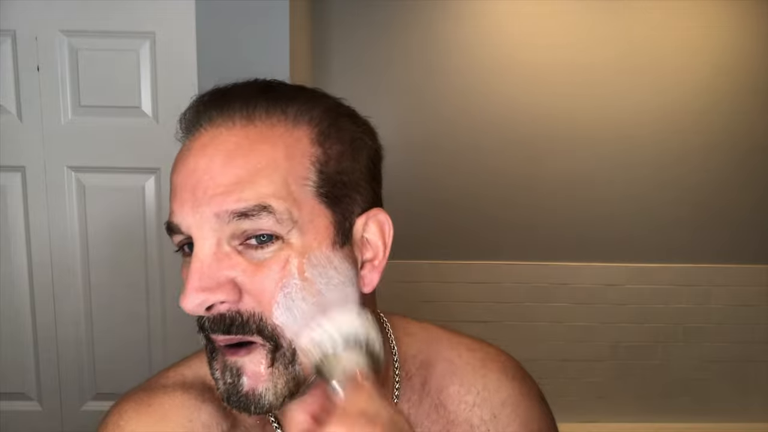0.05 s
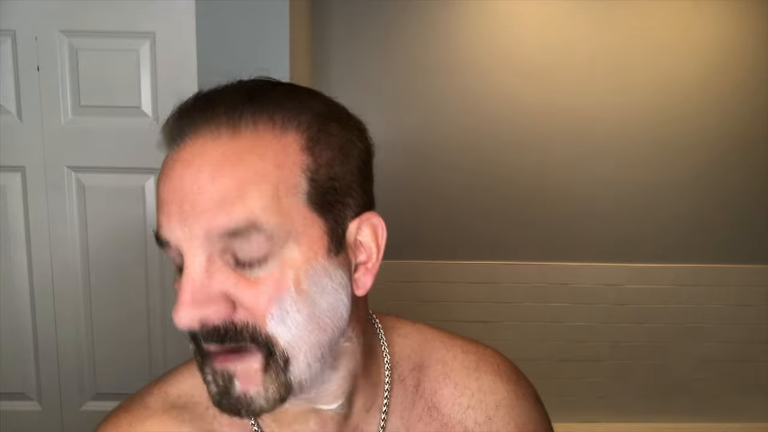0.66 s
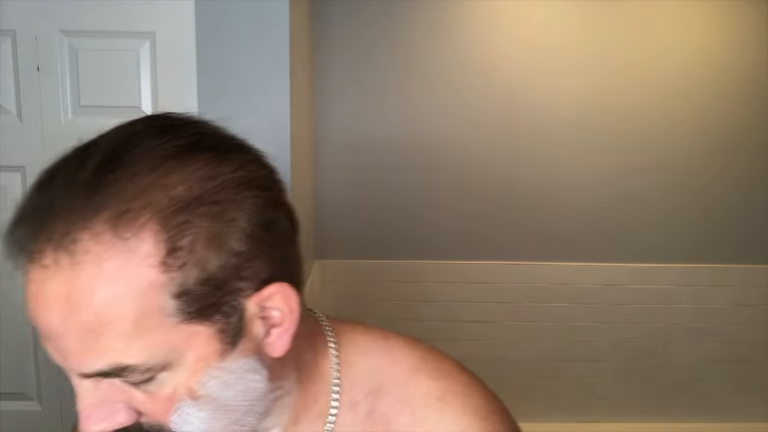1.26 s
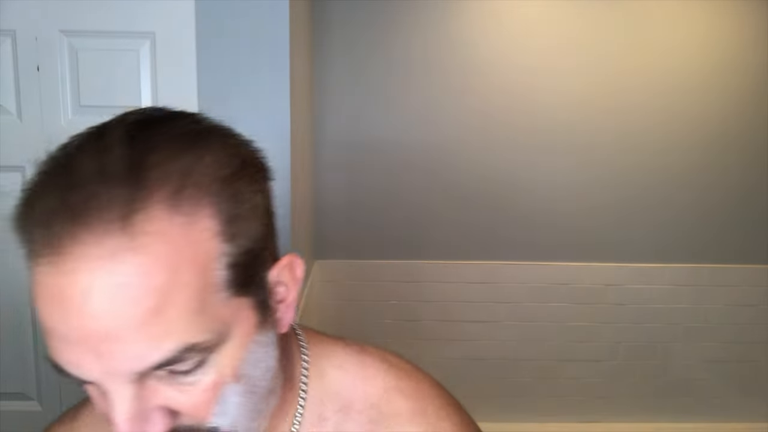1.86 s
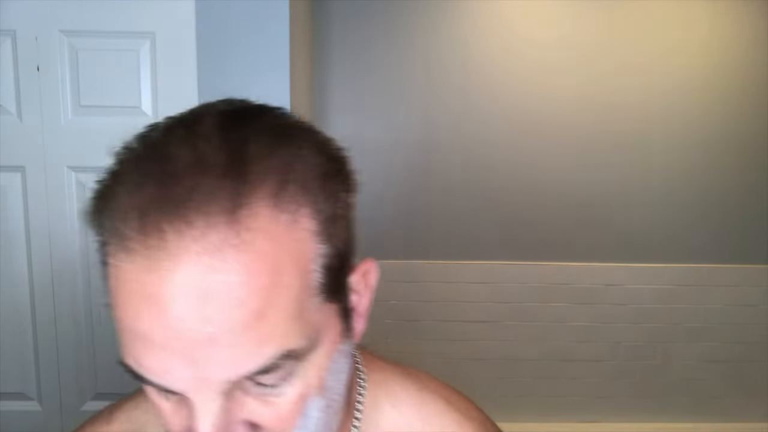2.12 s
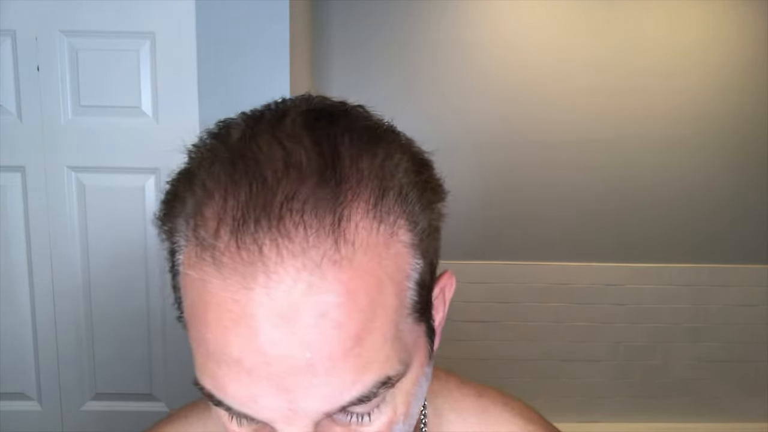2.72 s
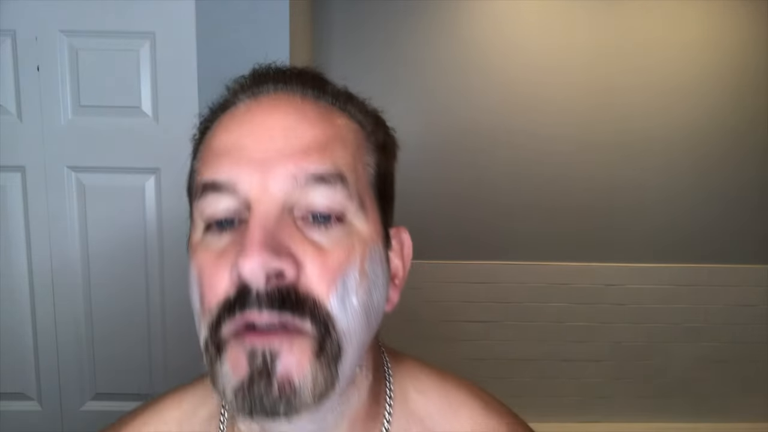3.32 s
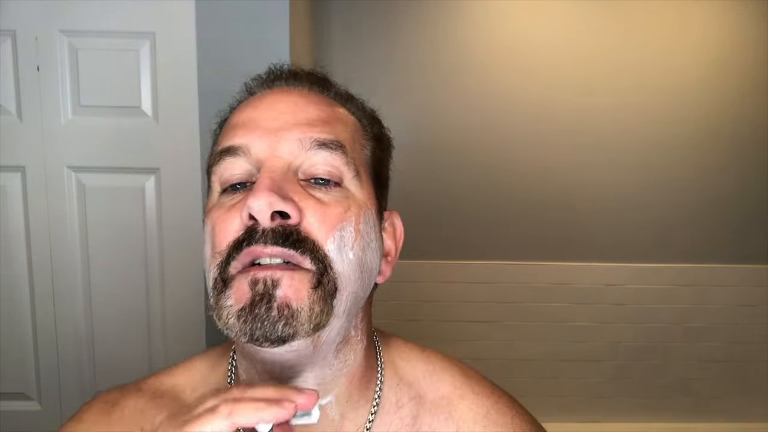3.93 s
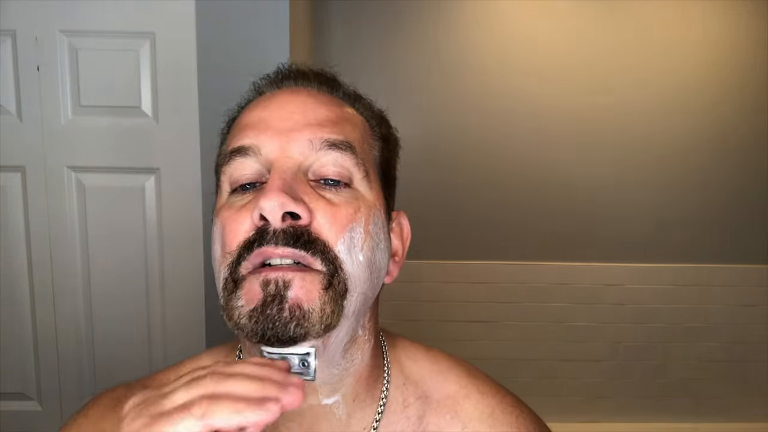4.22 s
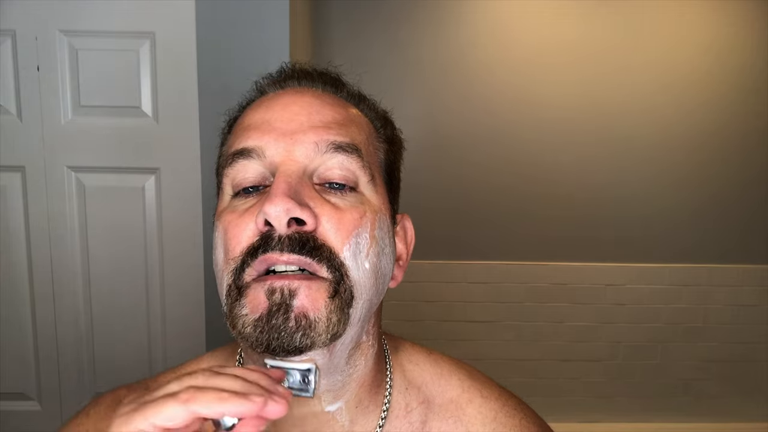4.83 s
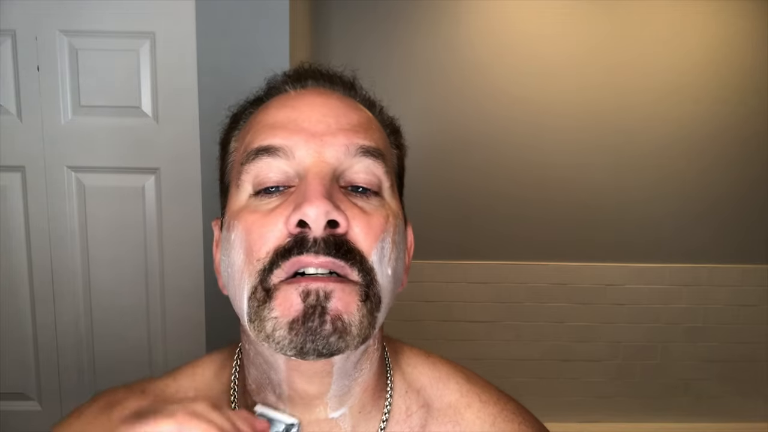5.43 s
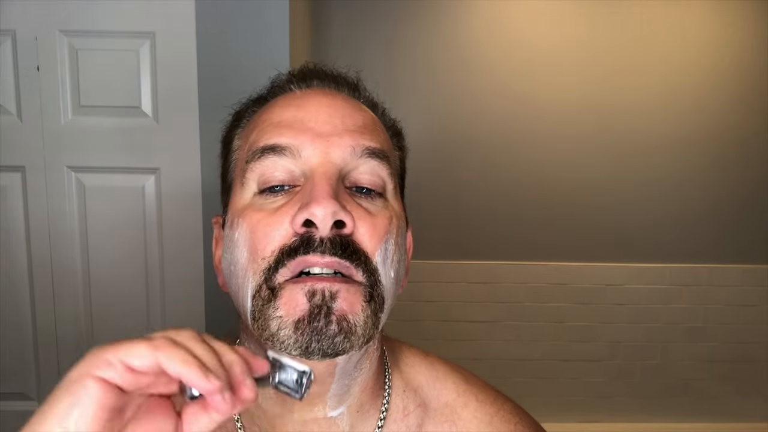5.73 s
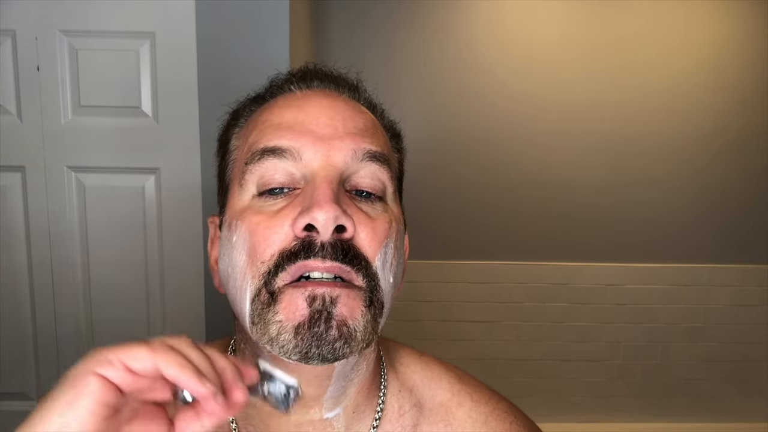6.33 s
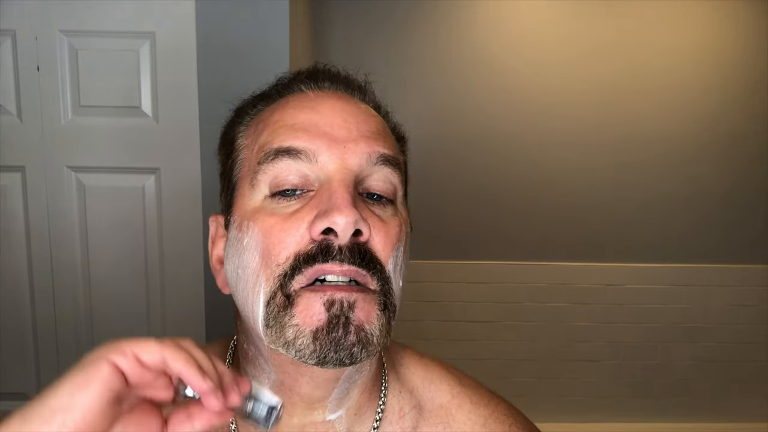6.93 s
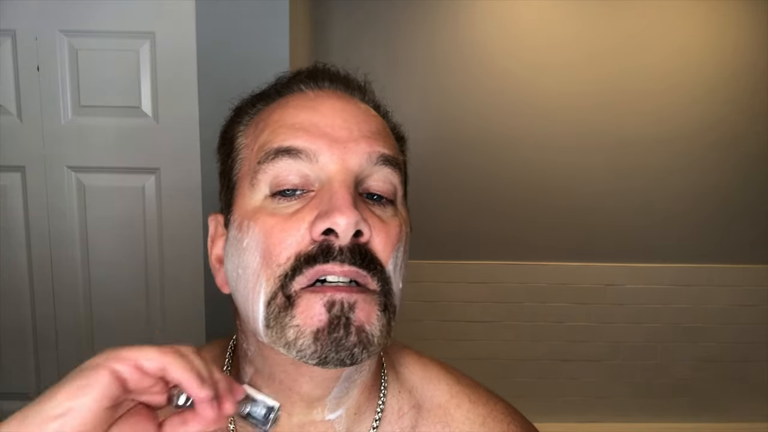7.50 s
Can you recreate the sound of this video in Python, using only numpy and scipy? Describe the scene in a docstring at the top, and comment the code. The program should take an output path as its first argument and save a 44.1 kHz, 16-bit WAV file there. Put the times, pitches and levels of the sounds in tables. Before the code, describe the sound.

A shaving brush swishes softly through lather, then is set down on the counter with a loud, ringing knock. A tap handle clicks, and water briefly hisses and splashes over a razor while the drain glugs. After a last gurgle, the razor scrapes through stubble in five slow, quiet strokes. The microphone is close, in an echoing tiled bathroom with faint ventilation.

```python
"""A tiled bathroom, heard through one close microphone. A shaving brush swishes through lather and is
set down hard on the counter, which rings. The tap handle clicks, water hisses and splashes over a razor,
and pockets of air glug in the drain. Then the razor scrapes through stubble in slow strokes.
The tiles echo these sounds, and the ventilation rushes faintly behind them."""
import sys
import numpy as np
from scipy import signal
from scipy.fft import rfft, irfft, next_fast_len
from scipy.io import wavfile
from scipy.ndimage import map_coordinates

SR = 44100
rng = np.random.default_rng(int(sys.argv[2]) if len(sys.argv) > 2 else 0)


def transcribe(signal):
    """Save signal, clipped to [-1, 1], as a 16-bit WAV file at the path in sys.argv[1]."""
    frames = np.atleast_2d(signal).T
    limited = np.clip(frames, -1, 1)
    pcm = np.round(limited * 32767).astype(np.int16)
    wavfile.write(sys.argv[1], SR, pcm)


N = 333396


# tone of the jet, from low to high: f/Hz, level/dB
JET_TONE = [(150, -24), (400, -19), (900, -16.5), (1150, -11), (1600, -8.5), (3700, -11.5), (5000, -4),
            (6400, -9), (8700, -14), (11000, -7.5), (15500, -6)]
# notes the spout sings: f/Hz, width/Hz, level/dB
SPOUT_NOTES = [(1536, 92, -11.5), (2360, 55, -11.5), (3000, 60, -15), (4950, 130, -9.5), (6330, 68, 0),
               (7330, 50, -5.5), (7880, 210, -10)]
# bursts of spray as the razor enters the jet and is turned over: t/s, level/dB
SPRAY_BURSTS = [(2.331, -38.5), (2.909, -43.5)]
# tone of the spray: f/Hz, level/dB
SPRAY_TONE = [(530, -45), (900, -19), (1750, -26), (1980, -16.5), (2860, -4.5), (3500, -4.5), (4600, -1),
              (5840, -2), (7410, 0), (9510, -2), (15500, -8.5)]
# big drops thrown off the razor: t/s, level/dB, f/Hz
BIG_DROPS = [(2.331, -19, 7100), (2.3624, -26, 6540), (2.5548, -25, 7250), (2.5634, -18, 6350),
             (2.6227, -23.5, 6560), (2.647, -25, 12000), (2.754, -30, 13100), (2.8428, -24, 6000),
             (2.8746, -24, 6800), (3.1029, -24.5, 7100)]
def tap():
    """Water hisses through the tap's mesh, sings in the spout and breaks into drops on razor and basin."""
    hiss = coloured(grains(rate=9000, spread_db=5), JET_TONE)
    song = resonate(rng.standard_normal(N), SPOUT_NOTES)
    jet = flow() * amp(1.36 * wobble(25)) * (amp(-42) * hiss + amp(-47) * song)
    razor_in_jet = envelope(start=2.331, end=3.1, rise_s=0.003, fade_s=0.06)
    impact = amp(-43.5) * flow() ** 0.216 * razor_in_jet  # the spray weakens more slowly than the flow
    impact += swells(SPRAY_BURSTS, rise_s=0.003, fade_s=0.368)
    flicker = amp(0.64 * wobble(45))
    spray = coloured(droplets(rate=2000, spread_db=5, cycles=15.6), SPRAY_TONE)
    drops = pings([(s, db, hz, 12 / hz, 0.2) for s, db, hz in BIG_DROPS], rise=0.094)
    return room(jet, wet_db=-4.5) + room(impact * flicker * spray + drops, wet_db=-5.5)


def flow():
    """How much water runs, from 0 to 1: the tap opens at once, runs and is eased shut."""
    return envelope(start=2.174, end=2.835, rise_s=0.013, fade_s=0.9)


# water sloshes in the trap, the bend under the basin: t/s, level/dB
TRAP_SLOSHES = [(2.07, -59), (2.26, -81), (3.0, -54.5), (3.42, -60.5), (3.6, -70.5), (3.82, -64)]
# low notes of the trap: f/Hz, width/Hz, level/dB
TRAP_NOTES = [(76, 19, -3.5), (136, 63, -3), (252, 54, 3.5), (454, 560, -9.5)]
# big air pockets glug, small ones chirp, and one high drip falls at 3.453 s: t/s, level/dB, f/Hz, life/s,
# glide/octaves per life
AIR_POCKETS = [(2.038, -49.5, 196, 0.092, -0.84), (2.108, -46.5, 126, 0.064, 0),
               (2.155, -46.5, 117, 0.059, 0.14), (2.361, -43.5, 265.5, 0.059, .1),
               (2.958, -51, 243.6, 0.099, 0.083), (2.982, -43.5, 114, 0.06, 0.24),
               (3.035, -50, 117, 0.038, 0.32), (3.1, -57.5, 259.4, .17, -0.13),
               (3.24, -61, 256, 0.18, -0.014), (3.453, -59, 4000, 0.0075, 0), (3.495, -61, 650, .068, 0.62),
               (3.515, -48.5, 139, 0.055, .1), (3.744, -57.5, 2300, 0.096, -0.053),
               (3.749, -59, 1815, 0.041, 0.039)]
# the emptying drain sucks air: t/s, level/dB
AIR_GULPS = [(3.598, -62), (3.788, -56.5), (3.816, -54.5), (3.935, -67), (3.963, -65.5)]
# notes of the waste pipe: f/Hz, width/Hz, level/dB
PIPE_NOTES = [(280.6, 120, -11), (975.6, 83, 4.5), (1545, 99, 2.5), (2160, 150, 3), (2900, 430, -4.5),
              (3740, 120, -2.5), (4670, 180, -7), (5600, 310, -7), (7730, 3000, -18)]
def drain():
    """Water churns and air pockets glug in the trap; the last water leaves with a squeak and a gurgle."""
    stir = amp(-63.5) * flow() + swells(TRAP_SLOSHES, rise_s=0.11, fade_s=0.82)
    churn = stir * resonate(grains(rate=400, spread_db=0), TRAP_NOTES)
    glugs = pings(AIR_POCKETS, rise=0.05) * amp(2.3 * wobble(70))
    suction = swells(AIR_GULPS, rise_s=0.018, fade_s=0.12)
    gurgle = suction * resonate(grains(rate=650, spread_db=3), PIPE_NOTES)
    return churn + room(glugs, wet_db=-3.5) + room(gurgle, wet_db=-3.5)


# the hit that sets off crack, thud and ring: t/s, level/dB
BRUSH_HIT = [(1.339, 8)]
# tone of the thud: f/Hz, level/dB
THUD_TONE = [(30, -54), (45, -28.5), (68, -3.5), (110, -15.5), (200, -5), (400, -8), (520, -0.5), (800, -7),
             (1100, -3), (2300, -3), (3800, -4.5), (5500, -10.5), (8000, -16), (9500, -28), (15500, -30.5)]
# notes of counter and basin: f/Hz, relative level/dB, time to fade by 60 dB/s
COUNTER_NOTES = [(343, -10.5, .6), (542, -7.5, 0.6), (677, -7.5, .85), (823, -13.5, 0.99),
                 (993, -6.5, 0.79), (1152, -11, 0.86), (1364, -6.5, 0.49), (1794, -8, .35),
                 (1997, -10, 0.49), (2287, -1.5, 0.552), (2455, -7.5, 0.82), (2859, -6, 0.71),
                 (3060, -10, 0.62), (3163, -15, .7), (3430, -5, 0.83), (3550, -7.5, .6), (3845, -7, 0.5505),
                 (3891, -12, .6), (4520, -13.5, .6), (5684, -15.5, 0.78)]
def brush_knock():
    """The hard brush handle hits the counter with a sharp crack and a thud; counter and basin ring on."""
    t = np.arange(SR) / SR
    notes = sum(amp(db) * np.exp(-np.log(1000) * t / fade_s) * np.sin(2 * np.pi * (hz * t + rng.random()))
                for hz, db, fade_s in COUNTER_NOTES)
    ring = amp(-38) * strike(BRUSH_HIT, notes)
    crack = amp(-10.5) * strike(BRUSH_HIT, ping(hz=3265, life=0.0013, glide=0, rise=0.08))
    edge = amp(-36) * strike(BRUSH_HIT, ping(hz=11400, life=0.0025, glide=0, rise=0.087))
    thud = amp(-8) * strike(BRUSH_HIT, blow(THUD_TONE))
    crack = room(crack, wet_db=-8.5, early_db=4, early_s=0.04)
    return edge + crack + room(thud, wet_db=6.5, early_db=-6) + ring


# razor strokes: pressed down t/s, lifted t/s, time to land/s, rasp level/dB, crackle level/dB,
# extra pressure midway/dB, crackle gained from start to end/dB
RAZOR_STROKES = [(3.935, 4.217, .035, -71, -67, -3, 6.5), (4.62, 5.067, .06, -78, -70.5, 3.5, 3.5),
                 (5.578, 5.836, 0.023, -69, -70.5, -2.5, -7), (6.354, 6.55, 0.19, -63.5, -70.5, -3, 1),
                 (7.051, 7.244, 0.17, -60.5, -66.5, -1, 4.5)]
# tone of the blade on skin: f/Hz, level/dB
RASP_TONE = [(700, -9), (1900, -9.5), (2700, -3.5), (4500, -1.5), (6700, -3), (8300, -14.5), (15000, -19.5)]
# tone of the crackling foam: f/Hz, level/dB
CRACKLE_TONE = [(2500, -20), (7000, -2), (9000, -6.5), (13000, -2.5), (15500, 1)]
# single hairs being cut: t/s, level/dB, f/Hz
HAIR_SNAPS = [(4.8623, -50, 6820), (5.6638, -52, 5840), (5.7153, -44.5, 6460), (7.029, -54, 5530),
              (7.079, -51, 6270), (7.2044, -56, 5430)]
def razor():
    """The blade lands, drags and lifts; it rasps over the skin while foam crackles and hairs snap."""
    bite_db = 1.5  # the rasp loses this much over a stroke
    drag, cutting = np.zeros((2, N))
    for start, end, landing, rasp_db, crackle_db, midway_db, gained_db in RAZOR_STROKES:
        travel = np.clip((np.arange(N) / SR - start) / (end - start), 0, 1)
        pressure = envelope(start, end, landing, fade_s=0.28) * amp(midway_db * np.sin(np.pi * travel) ** 2)
        drag += amp(rasp_db + bite_db * (0.5 - travel)) * pressure ** 1.7
        cutting += amp(crackle_db + gained_db * (travel - 0.5)) * pressure
    rasp = drag * amp(0.65 * wobble(32)) * coloured(grains(rate=5000, spread_db=3), RASP_TONE)
    crackle = cutting * amp(1.2 * wobble(40)) * coloured(grains(rate=1400, spread_db=3.5), CRACKLE_TONE)
    snaps = pings([(s, db, hz, 4 / hz, 0) for s, db, hz in HAIR_SNAPS], rise=0.05)
    return room(rasp + crackle + snaps, wet_db=-10)


# fingers rub on the tap handle: t/s, level/dB
FINGER_RUBS = [(1.78, -59), (1.96, -60), (2.14, -63)]
# tone of the rubbing: f/Hz, level/dB
RUB_TONE = [(200, -9), (800, -2.5), (1600, -7.5), (3500, -4), (7000, -14.5), (15500, -29.5)]
# tone of the click: f/Hz, level/dB
CLICK_TONE = [(100, -6), (270, -3), (420, -11), (1100, -4.5), (1480, -1), (2000, -2), (2900, -3), (3600, 1),
              (4300, -15), (4900, -10), (7000, -19), (10000, -40), (15500, -35)]
# notes of the metal handle: f/Hz, level/dB, life/s
METAL_NOTES = [(1403, -53.5, 0.17), (3440, -38.5, 0.02), (3670, -31.5, 0.013), (3880, -46, .01),
               (4240, -42, 0.022)]
def tap_handle():
    """The handle rubs under the fingers, then clicks against its stop with a short metal clink."""
    stop_s, click_db = 1.9195, -26
    fingers = swells(FINGER_RUBS, rise_s=0.09, fade_s=0.64)
    rub = fingers * coloured(grains(rate=3700, spread_db=1), RUB_TONE)
    click = strike([(stop_s, click_db)], blow(CLICK_TONE))
    clink = pings([(stop_s, db, hz, life, 0) for hz, db, life in METAL_NOTES], rise=0.033)
    return rub + room(click, wet_db=9, early_db=-4) + room(clink, wet_db=-6.5)


# swishes of brush and hand: t/s, level/dB, time to swell/s
BRUSH_SWISHES = [(0.021, -58.5, 0.0073), (.06, -64, 0.014), (.28, -65.5, 0.055), (.5, -71, .02),
                 (.68, -76, .1), (.99, -67.5, .06), (1.25, -72, .1)]
# tone of the lather: f/Hz, level/dB
LATHER_TONE = [(120, -45.5), (200, -13), (273, 0), (315, -11), (358, -6.5), (957, -12), (1230, -10),
               (4840, -15.5), (15500, -27.5)]
def brush():
    """Wet bristles swish through the lather."""
    push = sum(amp(db) * envelope(s, s, rise_s, fade_s=0.45) for s, db, rise_s in BRUSH_SWISHES)
    return room(push * coloured(grains(rate=2600, spread_db=2.5), LATHER_TONE), wet_db=-8)


# small ticks and drips: t/s, level/dB, f/Hz
SMALL_TICKS = [(0.0189, -32, 4570), (0.4834, -44.5, 2508), (3.3536, -40, 2800), (3.559, -44, 2970)]
# soft bumps of the hands: t/s, level/dB, f/Hz
HAND_BUMPS = [(.02, -42.5, 633), (.023, -41, 302), (2.961, -46, 444), (3.356, -39, 248),
              (3.375, -42, 151.7)]
def ticks_and_bumps():
    """Small ticks and dull bumps around the basin each die away in about three vibrations."""
    ticks = pings([(s, db, hz, 3 / hz, 0) for s, db, hz in SMALL_TICKS], rise=0.0126)
    bumps = pings([(s, db, hz, 3 / hz, 0) for s, db, hz in HAND_BUMPS], rise=0.13)
    return room(ticks, wet_db=3.5, early_db=-9, early_s=0.051) + room(bumps, wet_db=-5)


# tone of the moving air: f/Hz, level/dB
AIR_TONE = [(20, -41.5), (35, -20), (55, 3), (70, -4), (91, -10.5), (126, -6), (209, -7), (313, -7.5),
            (480, -8), (700, -11.5), (1170, -16.5), (3000, -21), (7500, -23), (8800, -28), (15500, -27.5)]
def ventilation():
    """A faint steady rush of air."""
    return amp(-68.5) * coloured(rng.standard_normal(N), AIR_TONE)


# how long the tiles echo: f/Hz, time to fade by 60 dB/s
TILE_ECHO = [(80, 0.85), (250, 0.88), (700, 0.95), (2500, 0.72), (3800, 0.86), (5500, 0.77), (8000, 0.56),
             (12000, 0.59)]
def room(x, wet_db, early_db=-4, early_s=0.088):
    """Adds quick echoes off mirror and basin and the long ring of the tiles; wet_db sets how much."""
    hz, t, noise = signal.stft(rng.standard_normal(SR), SR, nperseg=256)
    fading = np.exp(-np.log(1000) * t / along(TILE_ECHO, hz)[:, None])
    tail = signal.istft(noise * fading, SR, nperseg=256)[1]
    t = np.arange(len(tail)) / SR
    early = rng.standard_normal(len(t)) * (rng.random(len(t)) < 0.04)
    early *= np.exp(-np.log(1000) * t / early_s)
    echoes = (tail / np.linalg.norm(tail) + amp(early_db) * early / np.linalg.norm(early)) * (t > 0.001)
    return x + amp(wet_db) * signal.fftconvolve(x, echoes)[:N]


def droplets(rate, spread_db, cycles, size=64):
    """A spray of tiny bursting drops, rate a second, each with its own pitch."""
    when, pitch, strength = rng.random((int(rate * N / SR), 3)).T[..., None]
    turns = 1500 * 10 ** pitch * np.arange(size) / SR  # pitches from 1500 to 15000 Hz
    peak = amp(-spread_db * np.log(strength + 0.04)) * 10 ** (pitch / 2)
    drop = peak * np.exp(-np.log(100) * turns / cycles) * np.sin(2 * np.pi * turns)
    samples = (when * N).astype(int) + np.arange(size)
    return unit(np.bincount(samples.ravel(), drop.ravel(), N)[:N])


def grains(rate, spread_db):
    """Tiny random snaps, about rate a second; spread_db makes their sizes uneven."""
    spikes = (rng.random(N) < rate / SR) * rng.choice([-1, 1], N)
    return unit(spikes * amp(spread_db * np.minimum(rng.exponential(size=N), 4)))


def ping(hz, life, glide, rise):
    """A note that dies away over life seconds and slides glide octaves; a small rise starts it sharply."""
    t = np.arange(int(2 * life * SR)) / SR
    shape = np.exp(-np.log(100) * t / life) * (1 - np.exp(-t / (rise * life))) ** 2
    return shape / shape.max() * np.sin(2 * np.pi * np.cumsum(hz * 2 ** (glide * t / life)) / SR)


def pings(rows, rise):
    """One dying note for each row of t/s, level/dB, f/Hz, life/s, glide/octaves per life."""
    out = np.zeros(N + SR)
    for s, db, hz, life, glide in rows:
        note = amp(db) * ping(hz, life, glide, rise)
        out[max(round(s * SR), 0):][:len(note)] += note
    return out[:N]


def strike(rows, sound):
    """Plays the sound at each row of t/s, level/dB."""
    s, db = np.transpose(rows)
    spikes = np.bincount(np.round(s * SR).astype(int), amp(db), N)[:N]
    return signal.fftconvolve(spikes, sound)[:N]


def blow(tone, size=4096):
    """The sharpest hit that has this tone, with an energy of 1."""
    cepstrum = irfft(np.log(amp(along(tone, np.fft.rfftfreq(size, 1 / SR)))))
    pulse = irfft(np.exp(rfft(2 * cepstrum[:size // 2], size)))  # packs the energy at the start
    return pulse / np.linalg.norm(pulse)


def envelope(start, end, rise_s, fade_s):
    """Rises to 1 at start, holds until end, then loses 60 dB every fade_s."""
    t = np.arange(N) / SR
    rising = np.clip(1 + (t - start) / rise_s, 0, 1)
    return rising * np.exp(-np.log(1000) * np.clip((t - end) / fade_s, 0, 10))


def swells(rows, rise_s, fade_s):
    """A volume that swells to each row of t/s, level/dB and fades again."""
    return sum(amp(db) * envelope(s, s, rise_s, fade_s) for s, db in rows)


def wobble(rate):
    """A smooth curve through rate random points a second."""
    steps = np.arange(0, N + 64, 64)
    points = rng.standard_normal(int(N * rate / SR) + 4)
    return np.interp(np.arange(N), steps, map_coordinates(points, [steps * rate / SR]))


def resonate(x, notes):
    """Makes x ring at each row of f/Hz, width/Hz, level/dB; the result has strength 1."""
    def response(f):
        return sum((-1) ** k * amp(db) * 1j * f * width / (hz * hz - f * f + 1j * f * width)
                   for k, (hz, width, db) in enumerate(notes))
    return unit(filtered(x, response))


def coloured(x, tone):
    """Shapes the lows and highs of x by a tone table; the result has strength 1."""
    return unit(filtered(x, lambda hz: amp(along(tone, hz))))


def filtered(x, response):
    """Multiplies each frequency in x by response(hz)."""
    size = next_fast_len(N + SR // 2)
    return irfft(rfft(x, size) * response(np.fft.rfftfreq(size, 1 / SR)), size)[:N]


def along(points, hz):
    """Reads between the rows of a table of f/Hz, value, with octaves evenly spaced."""
    f, values = np.transpose(points)
    return np.interp(np.log(hz + 1), np.log(f), values)


def amp(db):
    """Turns decibels into a multiplier."""
    return 10 ** (np.asarray(db) / 20)


def unit(x):
    """Scales x to an average strength (rms) of 1."""
    return x / np.sqrt(np.mean(x ** 2) + 1e-20)


def scene():
    """All sources reach one microphone, which feeds both channels."""
    mono = brush() + brush_knock() + tap_handle() + ticks_and_bumps()
    mono = mono + tap() + drain() + razor() + ventilation()
    return np.array([mono, mono])


def record(dry):
    """The recorder weakens the deepest bass and cuts off the highest treble."""
    bass_hz, top_hz = 28, 15800
    def response(hz):
        return (hz < top_hz) * (1j * hz / (1j * hz + bass_hz)) ** 2
    return np.array([filtered(channel, response) for channel in dry])


dry = scene()
out = record(dry)
transcribe(out)
```